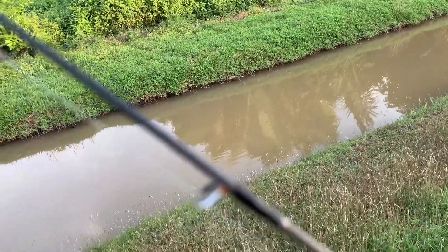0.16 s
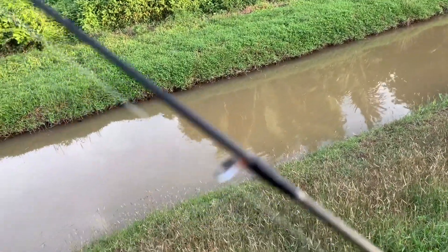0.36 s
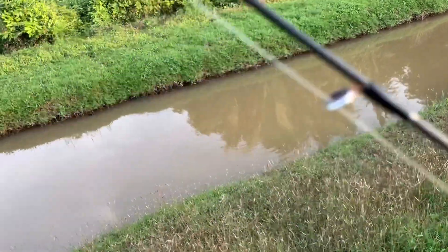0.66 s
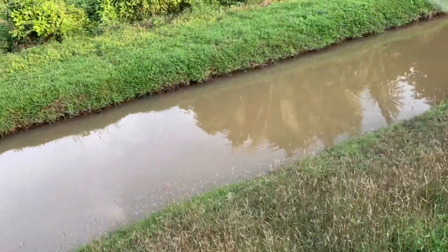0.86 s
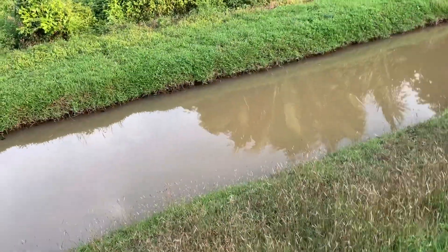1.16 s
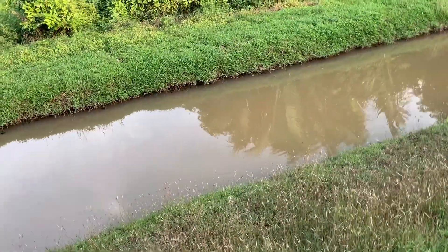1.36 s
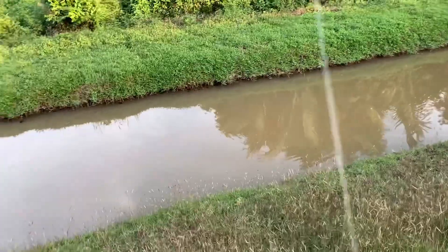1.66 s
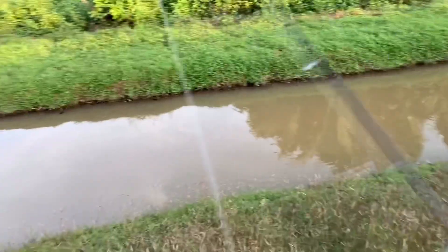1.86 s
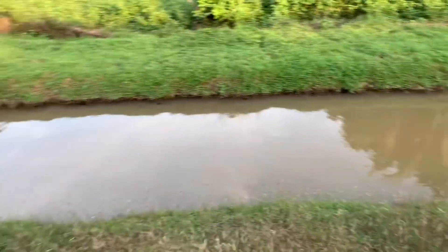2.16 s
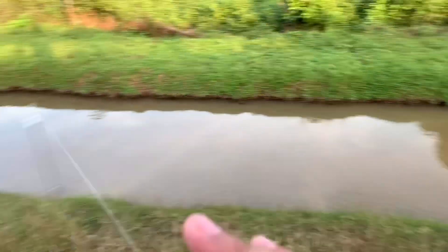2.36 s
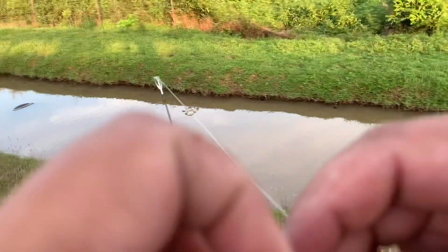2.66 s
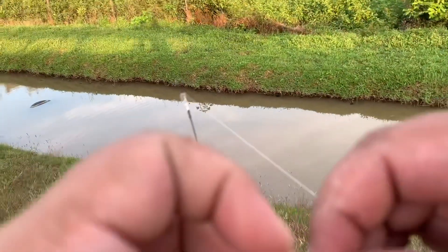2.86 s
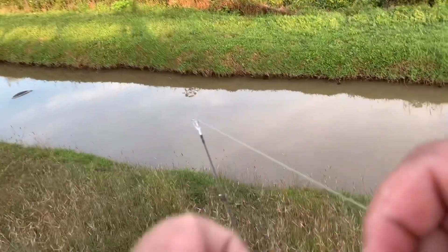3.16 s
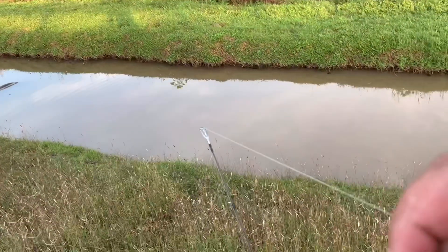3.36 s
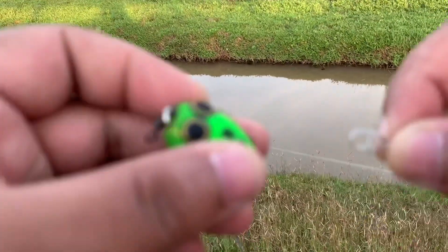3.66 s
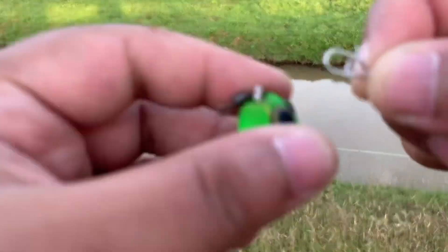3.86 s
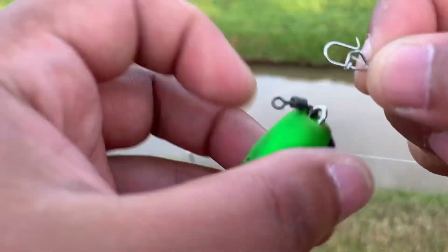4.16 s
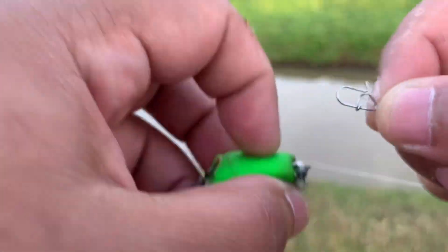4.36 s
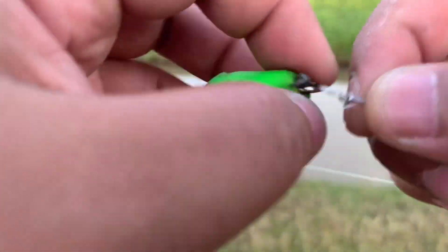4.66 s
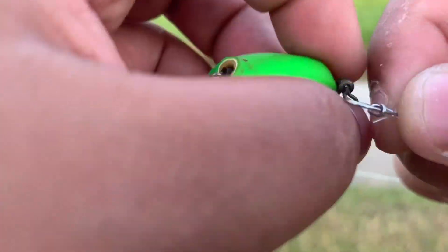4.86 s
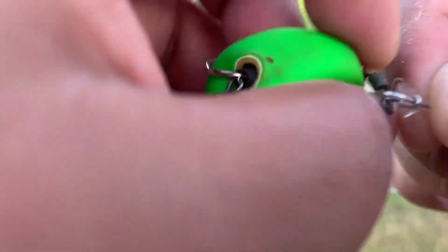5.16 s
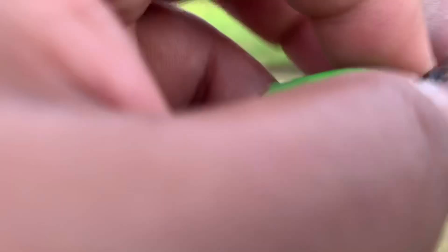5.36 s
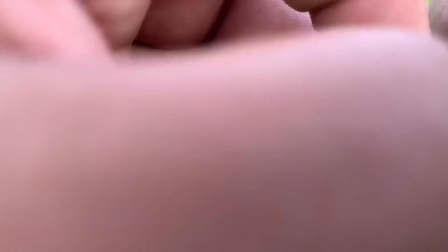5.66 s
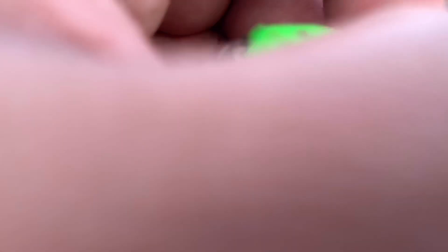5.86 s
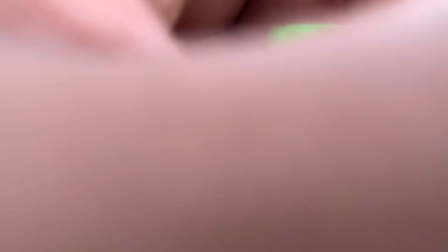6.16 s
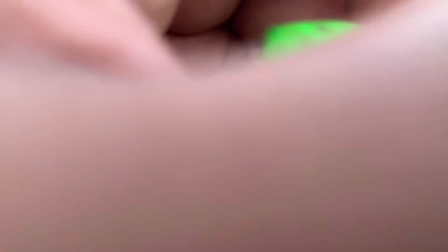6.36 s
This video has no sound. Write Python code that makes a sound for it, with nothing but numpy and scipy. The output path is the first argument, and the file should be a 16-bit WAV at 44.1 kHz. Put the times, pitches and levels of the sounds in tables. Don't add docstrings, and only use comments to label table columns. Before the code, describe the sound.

Steady deep traffic rumble from overlapping truck engines at a grassy canal bank, faint insects and breeze, a single dry knock midway.

```python
import sys
import numpy as np
from scipy import signal
from scipy.fft import rfft, irfft, next_fast_len
from scipy.io import wavfile
from scipy.ndimage import uniform_filter1d, map_coordinates

SR = 44100
rng = np.random.default_rng(int(sys.argv[2]) if len(sys.argv) > 2 else 0)


def transcribe(signal):
    frames = np.atleast_2d(signal).T
    limited = np.clip(frames, -1, 1)
    pcm = np.round(limited * 32767).astype(np.int16)
    wavfile.write(sys.argv[1], SR, pcm)


def level_to_linear(level):
    exponent = np.asarray(level, float) / 20
    return 10 ** exponent


N = 286650
TIME = np.arange(N) / SR

# t/s, firing rate/Hz, level/dB, load/dB per half octave of order
LORRY_1 = [(0.0, 77.95, -16.5, 2), (0.41, 76, -16.5, -2), (0.81, 74.2, -18.5, -1.5), (1.3, 73.83, -21.5, 2),
           (2.0, 72.87, -25, 2.5), (3.25, 73.5, -25, 3), (4.4, 74.02, -31, 4), (5.3, 74.9, -30.5, 1.5),
           (6.5, 74.84, -36, 5)]
LORRY_2 = [(0.0, 116.2, -16, 3), (0.3, 114.2, -22, -5.5), (0.748, 112.3, -16.5, 0.5),
           (1.0, 109.3, -11, 0.5), (1.248, 108.2, -8.5, 1), (1.5, 105.3, -8.5, -2.5),
           (1.748, 102.8, -10, 1), (2.0, 100, -12.5, 1.5), (2.4, 95.65, -24.5, -5)]
LORRY_3 = [(2.25, 96.9, -33, 0), (2.5, 95.22, -21.5, 0.54), (2.75, 94.02, -16.5, 0.075),
           (3.1, 93.12, -19, 0), (3.6, 93.2, -20.5, 2), (4.1, 93.28, -21.5, 1.03), (4.5, 92.97, -21.5, 0),
           (5.0, 93.4, -23.5, 0.071), (5.5, 93.34, -25.5, 0.73)]
LORRY_4 = [(0.8, 62.58, -24, -1.4), (1.58, 61.3, -21, -2.2), (2.1, 60.13, -14.5, -0.72),
           (2.61, 56.8, -14, -0.63), (3.13, 55.64, -26, -0.69), (3.5, 56.3, -17.5, 0.078),
           (4.43, 51.02, -14, -2.15), (5.2, 49.69, -21, 0.098), (6.5, 49.3, -22, -0.22)]
LORRY_5 = [(2.3, 64.2, -29, 0), (2.579, 63.6, -25, 0.001), (2.87, 62.46, -29, 0), (3.15, 62.2, -20, 0),
           (3.43, 60.64, -21.5, 0), (4.0, 57.8, -20, 0)]
LORRY_6 = [(4.3, 55.03, -30, -2.5), (4.6, 54.75, -30.5, 1.5), (4.85, 54.88, -15, -3), (5.12, 54.1, -33, 1),
           (5.4, 53.44, -13.5, -2), (5.68, 53.77, -19.5, 0.5), (5.949, 52.93, -18, 1),
           (6.221, 51.74, -21, 2), (6.5, 50.6, -12, 0.8)]
# order 1/dB, order 2/dB, order 3/dB, upper orders/dB
EXHAUST_VOICES = [
    (0, -2.5, -19, -34),
    (0.5, -15.5, -19, -36.5),
    (0, -0.5, -15, -38),
    (-7, 0.5, -13, -31.5),
    (-14, 2, -13, -24.5),
    (-20.5, 1, -11, -17.5),
]
# order, level/dB
UPPER_ORDERS = [(4, -5), (5, 0), (6, 2), (7, -5), (8, -4.5), (9, -9), (10, -16.5)]
# f/Hz, width/Hz, level/dB
BANK_ECHO = [(202.1, 10.1, -13), (332.8, 17.7, -15), (85, 10.6, -2), (236.4, 23, -4.5)]
# t/s, heavy traffic level/dB, car level/dB, share of cars abreast/0-1
TRAFFIC = [(0.0, -33, -38, 0.93), (0.6, -33.5, -38.5, 0.97), (1.3, -35.5, -37, 0.58),
           (2.06, -34.5, -37.5, 0.5), (2.3, -34, -35.5, 0.17), (2.8, -34.5, -36.5, 0.38),
           (3.3, -34, -37, 0.82), (3.6, -35, -37, 0.38), (4.3, -35, -38.5, 0.15),
           (4.95, -34.5, -39.5, 0.29), (5.2, -32.5, -39, 0.15), (5.5, -32.5, -38, 0.73),
           (6.2, -32.5, -37.5, 0.4), (6.5, -30.5, -38.5, 0.5)]
# t/s, share/0-1
LEFT_SHARE = [(0, .02), (1.5, 0.21), (2.5, 0.66), (4.5, 0.98), (5.5, 0.86), (6.5, 0.79)]
# f/Hz, level/dB
RUMBLE_COLOUR = [(20, -42), (35, -29), (50, -6), (80, 0.5), (120, -7), (200, -8.5), (300, -16.5),
                 (450, -24.5), (700, -54)]
ROAR_COLOUR = [(250, -11.5), (420, -2), (630, 0), (1000, 1), (1400, -6.5), (1900, -15.5), (2600, -42)]
FAR_TYRE_COLOUR = [(1000, -41), (1400, 0), (1800, 0), (2300, -11), (3000, -15), (4200, -15.5), (6000, -41)]
NEAR_TYRE_COLOUR = [(1300, -25), (1900, -0.5), (2500, -1), (3100, -4.5), (3700, -8.5), (4800, -19),
                    (6500, -29)]
# t/s, peak level/dB, f/Hz, time to fall 60 dB/s
KNOCK_HITS = [
    (2.8993, -17, 980, 0.0049),
    (2.9052, -27, 880, 0.0078),
]
# t/s, peak level/dB, f/Hz, time to fall 60 dB/s
TACKLE_TICKS = [
    (3.215, -47, 6510, .012),
    (3.42, -42, 14800, 0.018),
    (3.481, -35, 14300, 0.0068),
    (4.02, -41.5, 8220, .015),
    (5.18, -50, 15100, .004),
    (6.217, -43, 14500, .003),
]
# t/s, length/s, level/dB, first stroke rate/Hz, last stroke rate/Hz
BUZZ_PHRASES = [
    (0.367, .095, -46.5, 200, 96),
    (.46, 0.076, -45.5, 150, 195),
    (0.548, .345, -43.5, 190, 210),
    (.888, 0.12, -40, 150, 68),
]
# f/Hz, width/Hz, level/dB
WING_RESONANCES = [(10890, 690, 1.5), (12250, 700, 2), (13240, 1100, 0.5)]
# t/s, level/dB
CHORUS_LEVEL = [(0.0, -54.5), (0.9, -51), (1.1, -56.5), (1.94, -56.5), (2.3, -50.5), (2.7, -60),
                (3.25, -46.5), (3.8, -50.5), (4.0, -46.5), (4.2, -50.5), (4.5, -48.5), (5.5, -52),
                (5.65, -49), (5.8, -54), (6.2, -51), (6.5, -51.5)]
# f/Hz, level/dB
SONG_COLOUR = [(7500, -48), (8050, 3.5), (8500, -2), (9300, -2), (10000, -9)]
# t/s, level/dB
BREEZE_LEVEL = [(0, -57.5), (0.9, -53), (1.15, -64.5), (1.4, -60), (1.8, -60.5), (2.3, -48), (2.6, -52.5),
                (3.4, -47.5), (4.2, -50.5), (4.8, -56.5), (5.15, -53), (5.5, -59.5), (6.5, -57.5)]
# f/Hz, level/dB
RUSTLE_COLOUR = [(3000, -5.5), (4300, -2), (5500, -2.5), (7000, -5.5), (9000, -9.5), (10500, -7.5),
                 (12000, -25)]
HISS_COLOUR = [(6500, -21), (10000, -6), (12000, 7.5), (13800, -3), (14400, -16), (15000, -19),
               (15700, -22)]
# f/Hz, likeness/0-1
LIKENESS = [(90, 0.93), (300, 0.71), (1100, 0.78), (1800, 0.43), (4500, 0.28), (8000, 0.09), (9600, 0.18),
            (10500, 0.94)]
# f/Hz, phase/rad
BODY_LEAD = [(0, -.25), (260, .34), (600, -.94), (1800, .3), (2100, -1.05), (2800, -.07), (9800, -2.3),
             (13400, -.95)]
# f/Hz, left minus right level/dB
MIC_BALANCE = [(50, 0.5), (100, -1.4), (250, 1.2), (750, -2), (1500, -0.5), (3000, 0.5), (8000, -1.5),
               (12000, 0)]


def unit(x):
    return x / np.sqrt(np.mean(x ** 2) + 1e-20)


def along(points, hz):
    f, value = np.transpose(points)
    return np.interp(np.log(hz + 1), np.log(f + 1), value)


def curves(rows):
    times, *columns = np.transpose(rows)
    return [np.interp(TIME, times, column) for column in columns]


def wobble(rate):
    coarse = np.arange(0, N + 64, 64)
    knots = rng.standard_normal(int(N * rate / SR) + 4)
    return np.interp(np.arange(N), coarse, map_coordinates(knots, [coarse * rate / SR]))


def filtered(x, response):
    size = next_fast_len(N + SR // 4)
    padding = [(0, 0)] * (x.ndim - 1) + [(0, size - N)]
    eased = np.pad(x, padding, mode="linear_ramp")
    return irfft(rfft(eased) * response(np.fft.rfftfreq(size, 1 / SR)), size)[..., :N]


def rush(colour, patchy_db):
    cells = signal.stft(rng.standard_normal((2, N)), nperseg=512)[2]
    patches = uniform_filter1d(rng.standard_normal(cells.shape[1:]), 6, 0)
    patches = uniform_filter1d(patches, 14, 1)
    pair = signal.istft(cells * level_to_linear(patchy_db * unit(patches)), nperseg=512)[1][:, :N]

    def middle_and_side(hz):
        inside = (hz > colour[0][0]) & (hz < colour[-1][0])
        spread = np.arccos(np.clip(along(LIKENESS, hz), 0, 1)) / 2
        return inside * level_to_linear(along(colour, hz)) * [np.cos(spread), np.sin(spread)]

    middle, side = filtered(pair, middle_and_side)
    return unit(np.array([middle + side, middle - side]))


def arriving(pair, side):
    port_delay_s = 0.00036

    def half(hz):
        lead = np.interp(hz, *np.transpose(BODY_LEAD)) - 2 * np.pi * hz * port_delay_s
        return np.exp(1j * side / 2 * lead)

    return filtered(pair, lambda hz: np.array([half(hz), 1 / half(hz)]))


def engine(rows, voice):
    flutter_db, drift_rad, fade_s = 2.34, 0.37, 0.19
    to_edge = np.minimum(TIME - rows[0][0], rows[-1][0] - TIME)
    sound = np.clip(to_edge / fade_s + 0.5, 0, 1)
    on = sound > 0
    hz, level_db, load_db = np.array(curves(rows))[:, on]
    turns = 2 * np.pi * np.cumsum(hz) / SR
    orders = list(enumerate(voice[:-1], 1))
    orders += [(order, voice[-1] + db) for order, db in UPPER_ORDERS]
    air = [wobble(7)[on] for _ in range(4)]
    tones = 0
    for order, order_db in orders:
        echo_db = sum(db * np.exp(-((order * hz - f) / width) ** 2) for f, width, db in BANK_ECHO)
        flutter = flutter_db * max(order / 2, 1) ** 0.34 * air[int(order) % 4]
        tone_db = level_db + order_db + echo_db + load_db * np.log2(order) * 2 + flutter
        drift = drift_rad * max(order / 2, 1) ** 1.08 * air[int(order + 2) % 4]
        start = rng.uniform(0, 2 * np.pi)
        tones = tones + level_to_linear(tone_db) * np.sin(order * turns + start + drift)
    sound[on] *= tones
    return np.sqrt(2) * sound


def lane():
    roar_db, tyres_db, abreast = curves(TRAFFIC)
    abreast = np.clip(abreast, 0, 1)
    far_tyres = np.sqrt(1 - abreast) * rush(FAR_TYRE_COLOUR, patchy_db=1.2)
    near_tyres = np.sqrt(abreast) * rush(NEAR_TYRE_COLOUR, patchy_db=2.07)
    roar = level_to_linear(roar_db + 7.5) * rush(ROAR_COLOUR, patchy_db=1.67)
    return roar + level_to_linear(tyres_db) * (far_tyres + near_tyres)


def road():
    fleet = zip((LORRY_1, LORRY_2, LORRY_3, LORRY_4, LORRY_5, LORRY_6), EXHAUST_VOICES)
    lorries = sum(engine(rows, voice) for rows, voice in fleet)
    roar_db = curves(TRAFFIC)[0]
    mean_db = roar_db.mean()
    rumble_db = mean_db + 15.5 + 0.6 * (roar_db - mean_db)
    steady = lorries + level_to_linear(rumble_db) * rush(RUMBLE_COLOUR, patchy_db=1.5)
    left = np.clip(curves(LEFT_SHARE)[0], 0, 1)
    from_right = arriving(steady + np.sqrt(1 - left) * lane(), 0.94)
    from_left = arriving(np.sqrt(left) * lane(), -1.114)
    return from_right + from_left


def taps(rows, noisy, rise_s):
    out = np.zeros(N + SR)
    t = np.arange(SR // 20) / SR
    for start_s, db, hz, t60_s in rows:
        scratch = noisy * np.diff(rng.standard_normal(len(t) + 1))
        ring = scratch - np.sin(2 * np.pi * hz * t)
        shape = level_to_linear(-60 * t / t60_s) * (1 - np.exp(-t / rise_s)) ** 2
        out[round(start_s * SR):][:len(t)] += level_to_linear(db + 6) * ring * shape / shape.max()
    return out[:N]


def wing_ring(hz):
    total = 0
    for k, (centre, width, db) in enumerate(WING_RESONANCES):
        push = 1j * hz * width
        total = total + (-1) ** k * level_to_linear(db) * push / (centre * centre - hz * hz + push)
    return total ** 2 / (1 + (hz / 14300) ** 30)


def near_insect():
    swell_s, swell_db = 0.037, 9
    gain, rate = np.zeros(N), np.full(N, 150.0)
    for start_s, length_s, db, first, last in BUZZ_PHRASES:
        on = (TIME >= start_s) & (TIME < start_s + length_s)
        since = TIME[on] - start_s
        rate[on] = first + (last - first) * (since / length_s) ** 2.5
        to_edge = np.minimum(since, 4 * (length_s - since))
        edge_db = swell_db * np.clip(1 - to_edge / swell_s, 0, 1)
        slowing_db = 6.5 * np.log2(rate[on] / first)
        gain[on] = level_to_linear(db - edge_db + slowing_db)
    stroke = np.cumsum(rate * (1 + 0.08 * wobble(60))) / SR % 1
    burst = np.exp(-stroke / rate / 0.0035) + 0.06
    middle, side = burst * rng.standard_normal((2, N))
    scrape = middle + 0.15 * side * [[1], [-1]]
    buzz = unit(filtered(scrape, wing_ring))
    low = (uniform_filter1d(gain, size=2000).clip(0) / gain.max()) ** 0.6
    buzz = buzz + (1.3 * low - 1) * filtered(buzz, lambda hz: hz < 11400)
    return level_to_linear(2.5) * uniform_filter1d(gain, size=200) * buzz


def far_insects():
    level_db = curves(CHORUS_LEVEL)[0] + [[-1.5], [1.5]] + 0.9 * wobble(11)
    return level_to_linear(level_db) * rush(SONG_COLOUR, patchy_db=2.0)


def grass():
    breeze_db = curves(BREEZE_LEVEL)[0]
    turning_db = 1.5 * curves(LEFT_SHARE)[0]
    rustle_db = -47 + 0.25 * (breeze_db - breeze_db.mean()) + turning_db
    rustle = level_to_linear(rustle_db + 1.2 * wobble(6.3)) * rush(RUSTLE_COLOUR, patchy_db=1.85)
    hiss = level_to_linear(breeze_db + 2.0 * wobble(7)) * rush(HISS_COLOUR, patchy_db=1.5)
    return rustle + hiss


def scene():
    knock = taps(KNOCK_HITS, noisy=0, rise_s=0.0009)
    ticks = taps(TACKLE_TICKS, noisy=0.25, rise_s=0.0003) * [[1], [-0.3]]
    nature = arriving(far_insects() + near_insect() + grass(), 1)
    return road() + nature + knock + ticks


def low_pass(x):
    return signal.sosfilt(signal.butter(12, 15700, fs=SR, output="sos"), x)


def record(dry):
    def microphones(hz):
        return level_to_linear(along(MIC_BALANCE, hz) * np.array([[0.5], [-0.5]])) * (hz < 15700)

    fade_s = 0.003
    fade = np.sin(np.pi / 2 * np.clip(np.arange(N)[::-1] / (fade_s * SR), 0, 1)) ** 2
    heard = filtered(dry, microphones) * fade
    limited = heard / (1 + np.abs(heard / 1.04) ** 7) ** (1 / 7)
    return low_pass(limited)


dry = scene()
out = record(dry)
transcribe(out)
```